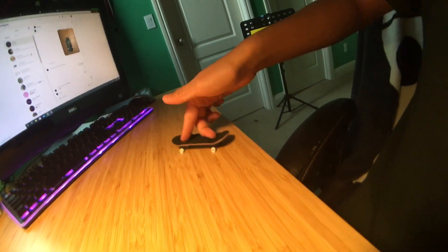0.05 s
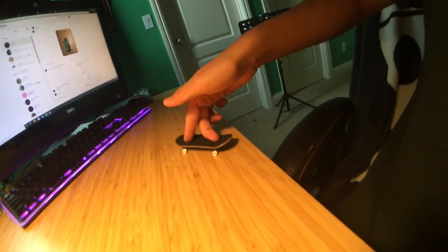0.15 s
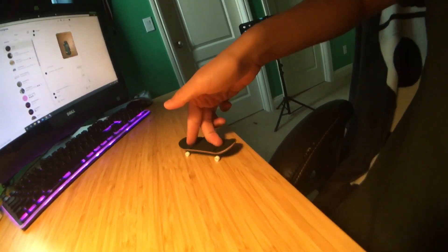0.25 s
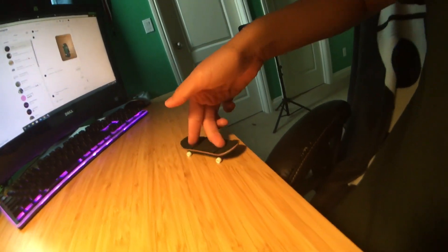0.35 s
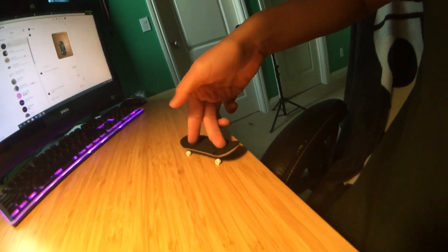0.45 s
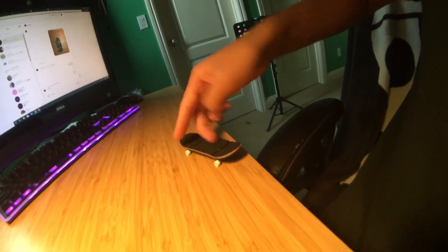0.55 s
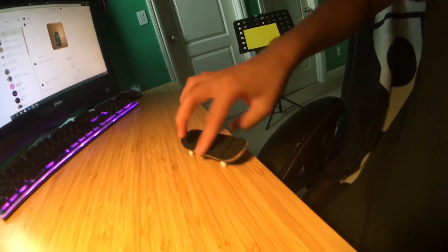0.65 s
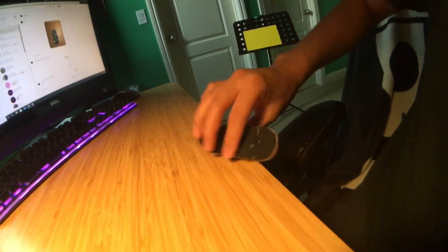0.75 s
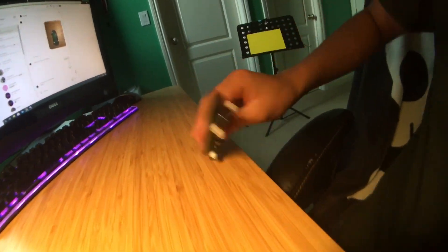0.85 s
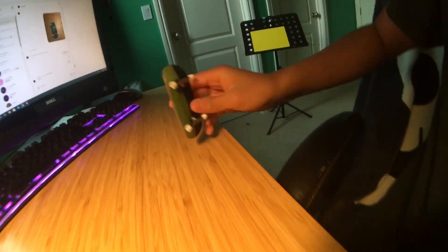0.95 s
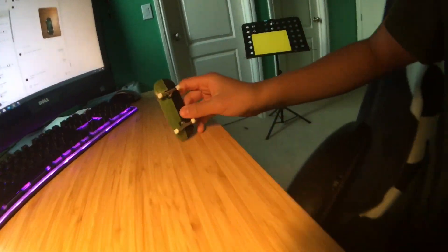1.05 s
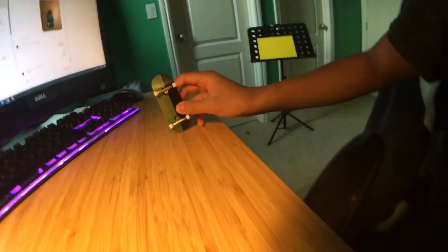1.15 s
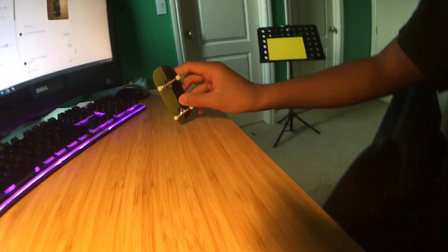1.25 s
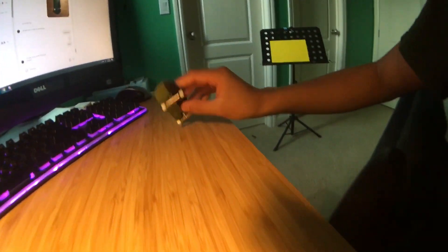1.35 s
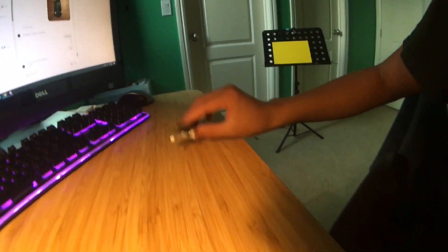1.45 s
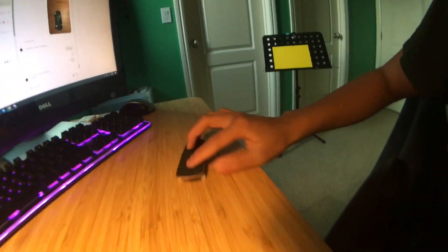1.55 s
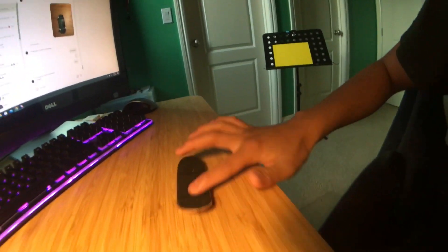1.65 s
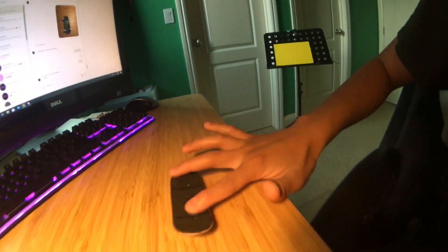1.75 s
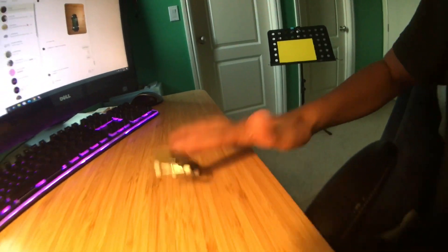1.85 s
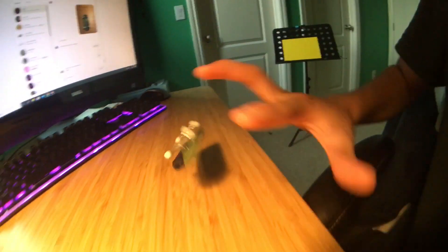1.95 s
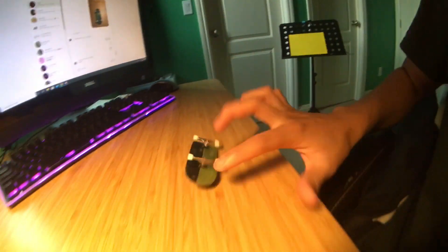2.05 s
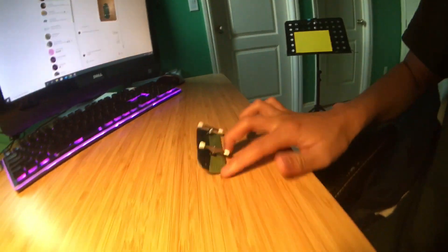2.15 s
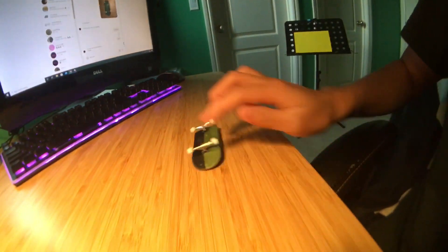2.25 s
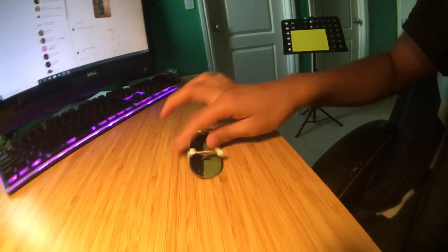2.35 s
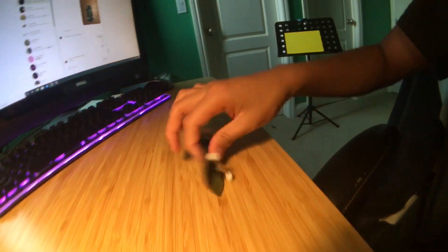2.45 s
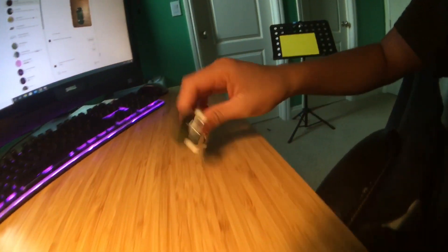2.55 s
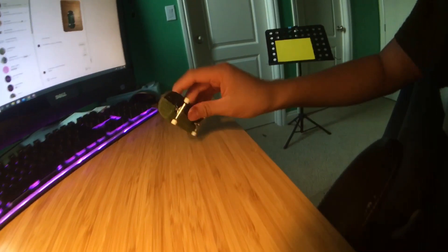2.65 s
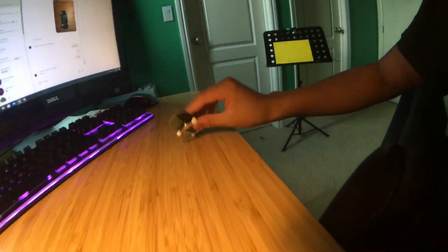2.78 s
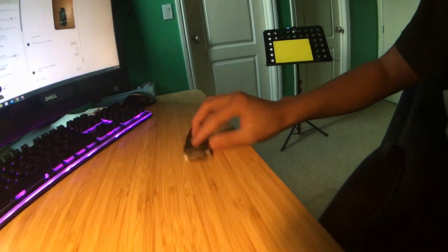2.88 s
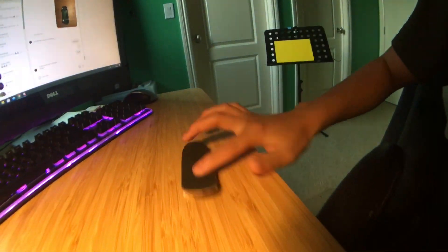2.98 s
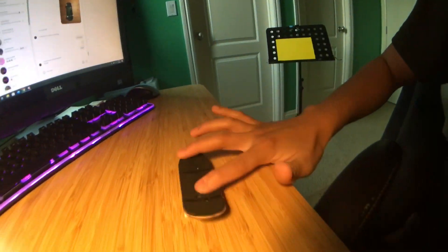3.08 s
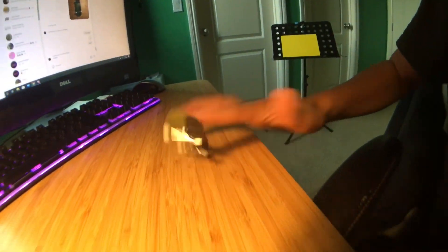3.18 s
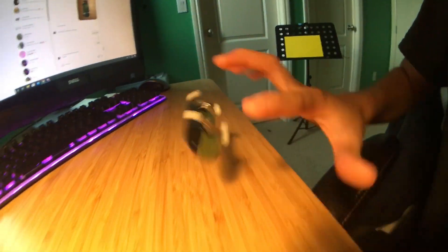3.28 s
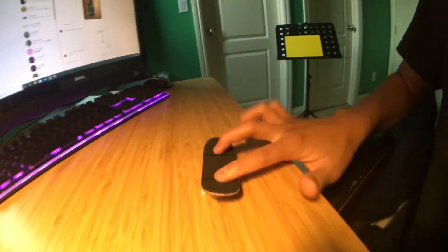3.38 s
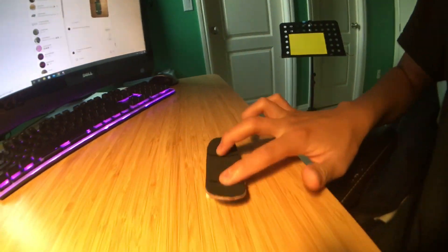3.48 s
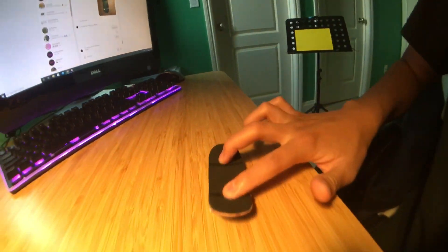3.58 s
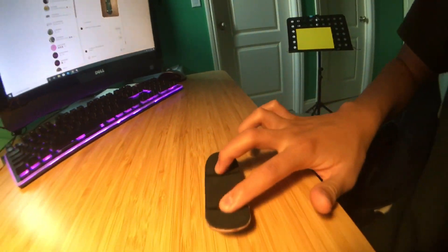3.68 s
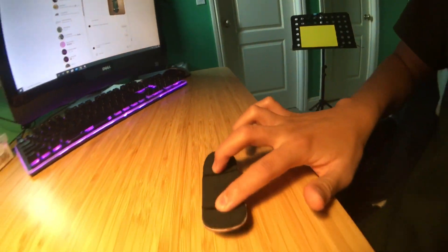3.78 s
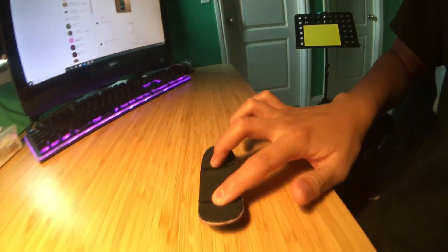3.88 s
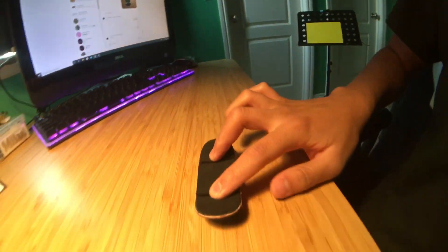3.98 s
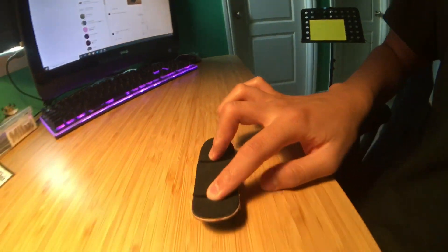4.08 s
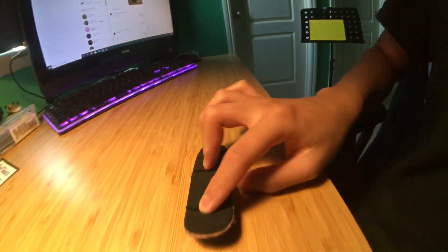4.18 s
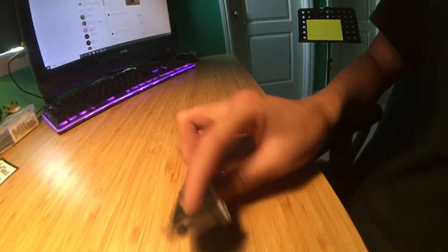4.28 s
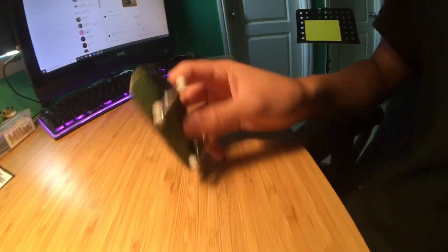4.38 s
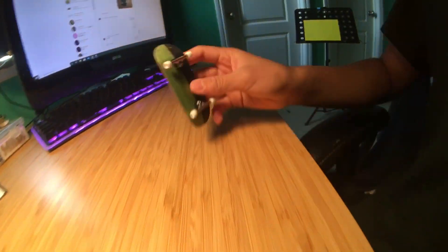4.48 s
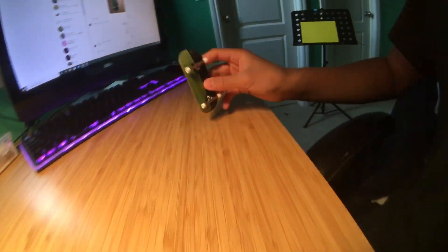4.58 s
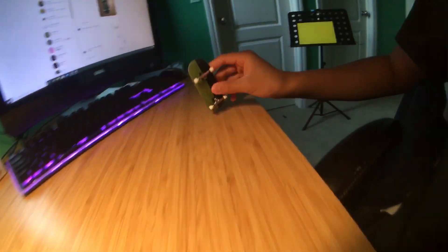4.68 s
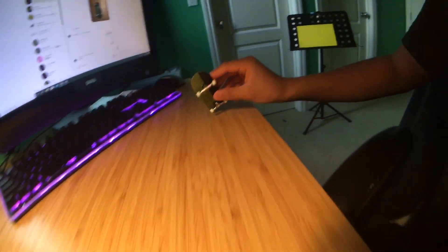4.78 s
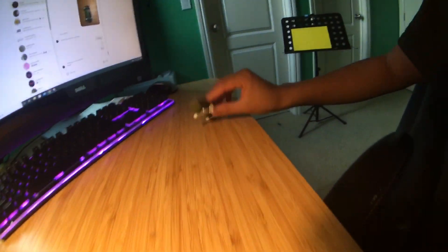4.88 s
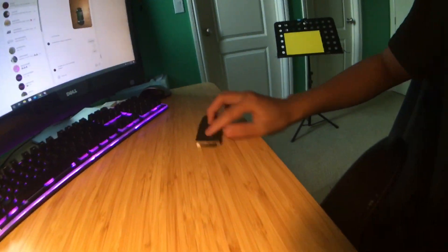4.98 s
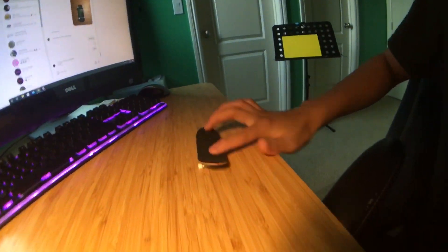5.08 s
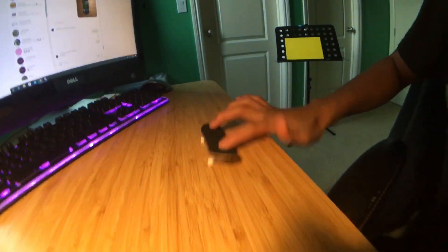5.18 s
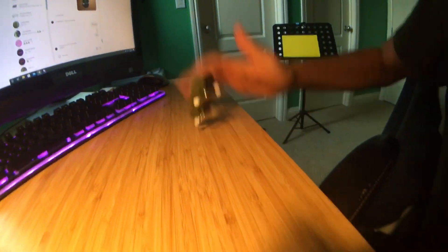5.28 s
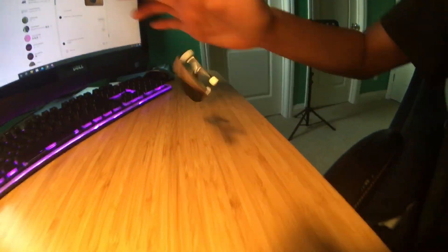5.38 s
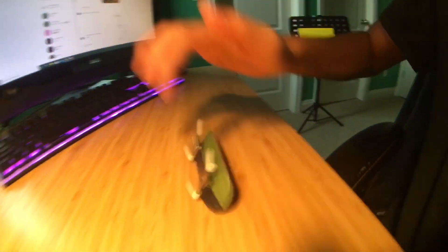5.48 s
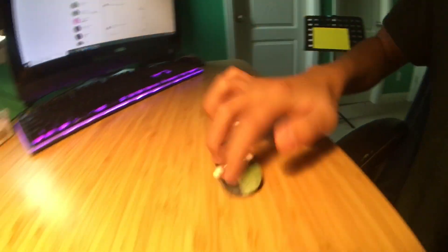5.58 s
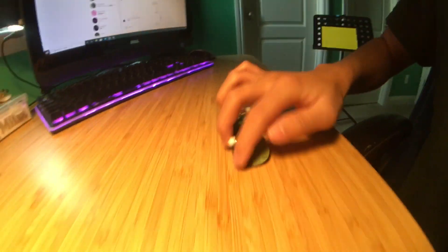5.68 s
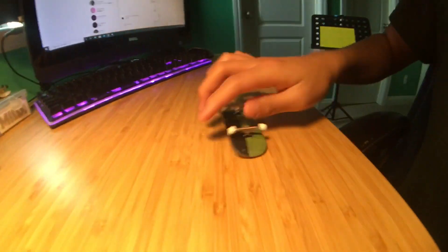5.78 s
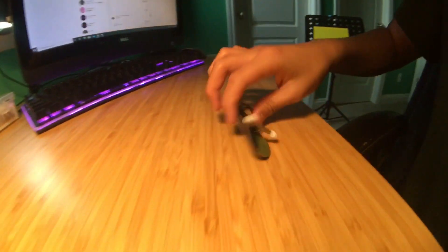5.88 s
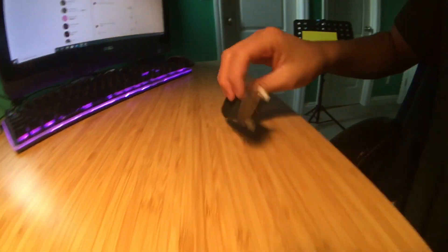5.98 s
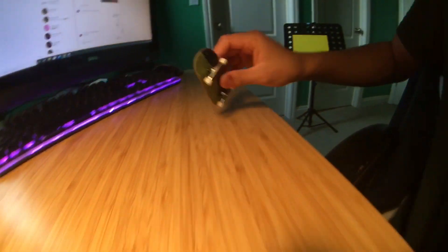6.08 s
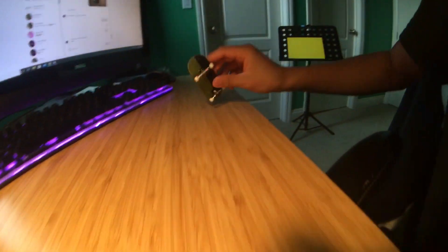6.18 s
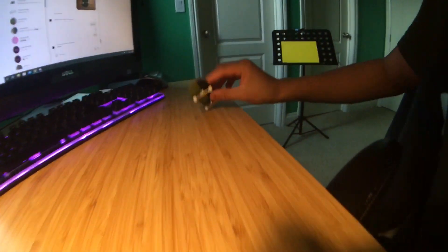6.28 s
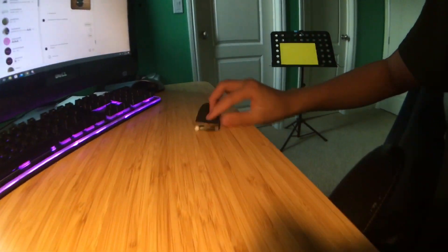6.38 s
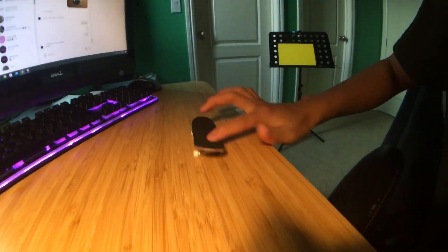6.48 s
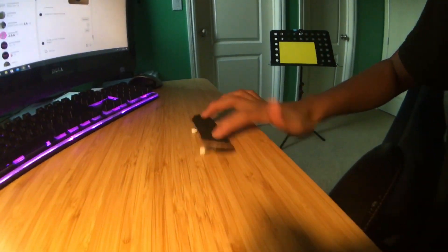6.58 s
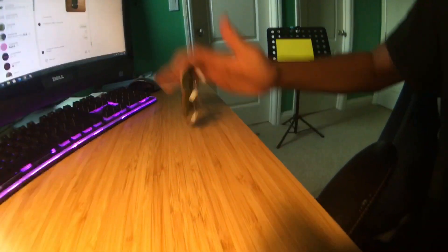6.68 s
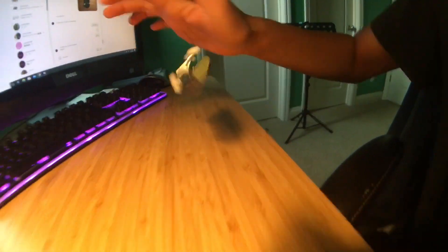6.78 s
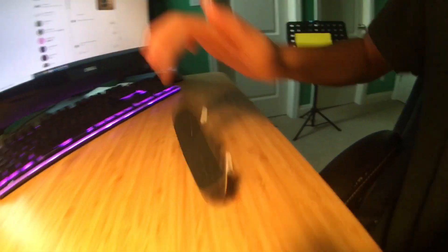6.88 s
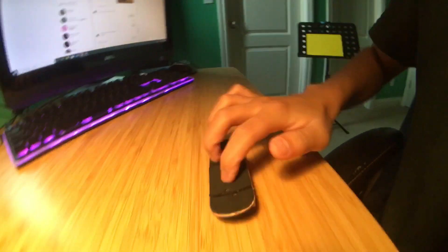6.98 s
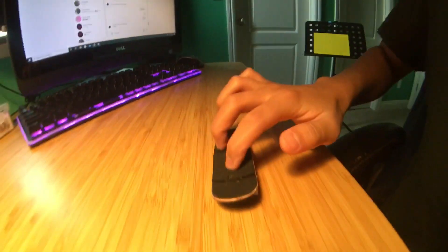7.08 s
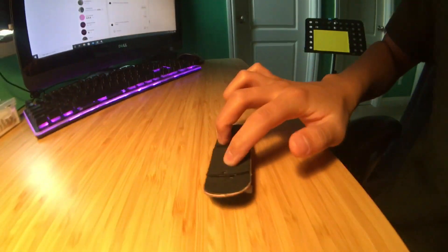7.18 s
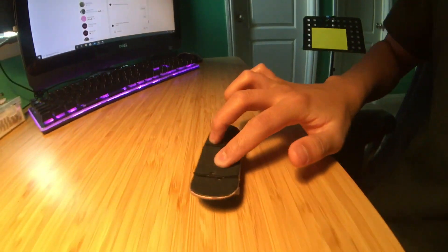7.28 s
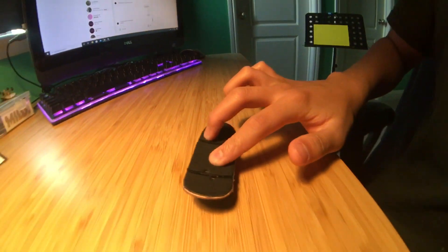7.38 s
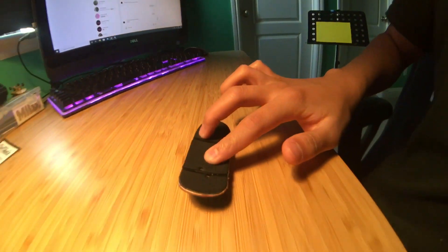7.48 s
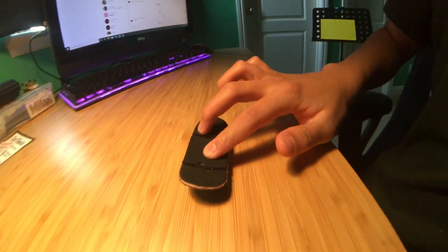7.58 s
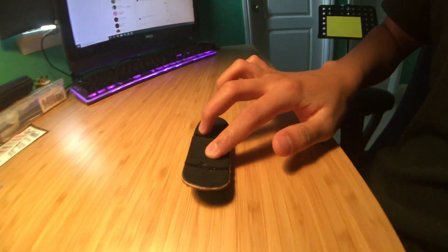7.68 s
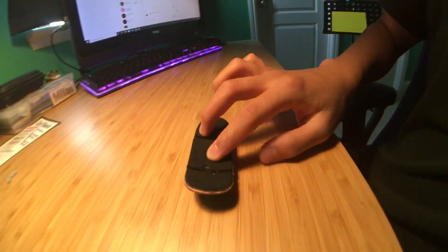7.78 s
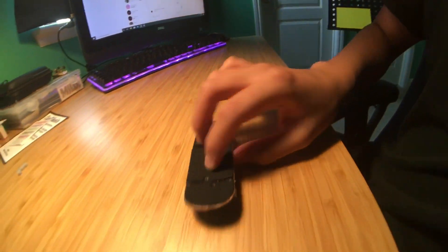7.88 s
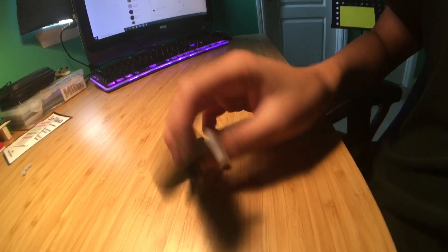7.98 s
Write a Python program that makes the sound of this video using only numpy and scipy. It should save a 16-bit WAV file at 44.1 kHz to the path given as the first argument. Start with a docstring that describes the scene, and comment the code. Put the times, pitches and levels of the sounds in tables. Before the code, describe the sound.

Small hard wheels patter low over wood grain, then hard clacks burst out as a miniature board lands on a desk. Four times come light set-down clicks, a brief rattling push, a loud tail pop and a landing or tumbling clatter with low desk thumps. Soft finger taps and slow rolls fill the gaps. The sound is close and slightly squashed at its peaks, with a short room tail and quiet hum.

```python
"""First comes the low patter of small wheels: a fingerboard rolls on a wooden desk, close to the microphone.
The place is a small room with still air and a computer hum, both made of shaped noise and steady tones.
Again and again the board is set down, rolls, pops its tail and lands or clatters over: bursts of noise and
dying modes, with desk, deck and room ringing on. Wheels are noise-driven resonances with rattle and grit.
The microphone has a notch in its treble and the loudest peaks are squashed."""
import sys
import numpy as np
from scipy import signal
from scipy.fft import rfft, irfft, next_fast_len
from scipy.io import wavfile

SR = 44100
rng = np.random.default_rng(int(sys.argv[2]) if len(sys.argv) > 2 else 0)


def dump(signal):
    """Clip the signal to [-1, 1] and save it as 16-bit WAV at the path in sys.argv[1]."""
    limited = np.clip(np.atleast_2d(signal).T, -1, 1)
    pcm = np.round(limited * 32767).astype(np.int16)
    wavfile.write(sys.argv[1], SR, pcm)


N = 354563
TIME = np.arange(N) / SR

# Levels are in dB; many of the functions below add trims of their own.

# still air of the room: pitch_hz, level_db [dB per Hz]
AIR = [(22, -31), (45, -4.5), (85, -5.5), (125, -3), (160, -4.5), (230, -12), (400, -14), (700, -20.5),
       (1150, -17.5), (2500, -30.5), (4500, -30), (8000, -36), (15000, -40.5)]
AIR_RMS_DB = -61.5
# steady computer hum and idle sway of the desk: pitch_hz, level_db [dB rms]
HUM = [(43.1, -70.5), (118.4, -66.5), (193.8, -67), (236.9, -69.5), (301.5, -83.5), (393, -76),
       (538.3, -80.5)]

# colour of the tail from desk and walls: pitch_hz, level_db
ROOM_COLOUR = [(60, -5.5), (200, 2.5), (500, -4), (1000, 3), (2500, -3.5), (5000, -6.5), (7500, -13),
               (12000, -11.5), (16000, -5.5)]
# decay of desk and room: pitch_hz, t60_s
ROOM_T60 = [(60, 0.63), (250, 0.38), (700, 0.53), (1800, 0.33), (4500, 0.54), (8000, 1), (14000, 0.39)]

# resonances of the desk top: pitch_hz, width_hz, level_db
DESK_RESONANCES = [(307, 11, 6.5), (355, 4.7, -8), (434.2, 8.9, 5.5), (539.4, 16, 0.5), (683, 11, 3),
                   (843, 16, -1.5), (954, 15, -5), (1067, 13, -9), (1167, 19, -7), (1320, 20, -8.5),
                   (1570, 33, -3.5), (1770, 15, -9), (1890, 37, -0.5), (2130, 24, -5), (2420, 35, -5.5),
                   (3170, 80, 1), (3490, 36, -1), (4050, 44, -4.5), (4700, 64, -8.5), (5340, 140, -4.5)]

# spectra of the rolling sounds: pitch_hz, level_db [dB per Hz]
RUMBLE_SPECTRUM = [(60, -41), (150, -30), (260, -26.5), (380, -16), (500, -6.5), (750, 4), (1150, 4.5),
                   (1650, 1.5), (1900, -3), (2300, -19), (3200, -45)]
DRONE_SPECTRUM = [(50, -14), (110, -11), (180, -4), (250, -15), (330, 1), (430, 0.5), (620, -2.5),
                  (1000, -38)]
RATTLE_SPECTRUM = [(1500, -4.5), (2300, 1.5), (3300, 1), (4600, 1.5), (5400, -3), (6200, -17.5),
                   (7500, -38), (9000, -46)]
FIZZ_SPECTRUM = [(5500, -21), (6800, -7), (7700, -22.5), (9200, -2.5), (10500, -9.5), (12000, 3),
                 (14000, -4), (15500, -6.5), (17000, -20)]

# spectra of the ringing desk top (low, wood) and deck: pitch_hz, level_db [dB per Hz]
LOW_RING_SPECTRUM = [(60, -4), (130, -7.5), (200, -4.5), (300, -7.5), (450, -4), (600, -12.5), (900, -42)]
WOOD_RING_SPECTRUM = [(300, -24), (550, 0), (800, -1), (1150, 2.5), (1500, -1.5), (2100, -0.5),
                      (2700, -12.5), (4000, -40.5)]
DECK_RING_SPECTRUM = [(1400, -23.5), (2400, -6.5), (3300, -1.5), (3900, -2), (4600, 1.5), (5400, -6.5),
                      (6200, -15.5), (7500, -28.5), (9000, -54.5)]

# fingers rub over the grip tape: centre_s, half_length_s [to 10 dB down], level_db
RUBS = [(0.95, 0.019, -56.5), (1.082, 0.051, -53), (1.69, 0.028, -36.5), (4.16, 0.08, -49),
        (5.035, 0.021, -30.5), (5.875, 0.0414, -50.5), (7.713, 0.034, -51)]
RUB_FIZZ_DB = -10  # against the rattle-coloured part

# wheels tick over the coarsest grit: start_s, level_db
COARSE_GRIT = [(0.153, -35), (0.4624, -34), (3.69, -31), (3.8611, -32), (4.0109, -24.5), (4.207, -22.5),
               (7.1386, -25.5), (7.222, -26), (7.3026, -29), (7.3422, -34), (7.707, -25), (7.7184, -28)]
FINE_GRIT_PER_S, FINE_GRIT_DB, FINE_GRIT_SPREAD_DB = 12, -5, 4  # level_db before trim, against the rumble

# the board coasts slowly, one list a ride:
# time_s, rumble_db, bite_db [rattle over rumble], wheel_resonance_hz
COASTS = [
    [(0.0, -40, -12, 870), (0.006, -38.5, -9, 898.5), (0.058, -34.5, -10.5, 985), (0.266, -46, -10.5, 826),
     (0.32, -41.5, -15, 677), (0.39, -45, -14.5, 838), (0.452, -39, -12.5, 725.4), (0.498, -53, -13, 644),
     (0.57, -60.5, -25, 600)],
    [(3.53, -56, -4.5, 1285), (3.576, -48, -3, 1134), (3.636, -43, -9.5, 1461), (3.71, -49.5, -7, 1383),
     (3.77, -48.5, -10, 982), (3.818, -44.5, -10, 1230), (4.062, -42, -9.5, 981), (4.112, -41, -14, 1080),
     (4.18, -38, -6, 1048)],
    [(7.05, -36, -13, 1067), (7.082, -42, -1.5, 1120), (7.13, -34.5, -11.5, 1140),
     (7.196, -42.5, -6.5, 1135), (7.324, -40.5, -11.5, 955), (7.374, -38.5, -10.5, 1166),
     (7.52, -44.5, -12, 1160), (7.552, -40, -10, 1200), (7.85, -39.5, -6.5, 964)],
]
COAST_DB, COAST_FADE_DB_PER_S = 4, 300

# the fingers push the board off: start_s, hardest_press_s, let_go_s, level_db,
# bite_db [at the hardest press], wheel_resonance_hz
PUSHES = [(1.44, 1.573, 1.724, -25.5, 2.5, 1119), (2.812, 2.944, 3.024, -25, 4, 978.6),
          (4.889, 5.016, 5.055, -29, 3.5, 1129), (6.319, 6.423, 6.5, -26.5, 5, 1097)]
PUSH_SOFT_START_DB, PUSH_ATTACK_S, PUSH_FALL_DB_PER_S = -12.5, 0.017, 180
PRESS_S, FREE_BITE_DB = 0.065, -13

# the wheels skid sideways: peak_s, level_db, bite_db, wheel_resonance_hz, rise_s [from 10 dB down]
SKIDS = [(1.691, -29, -2.5, 1057, .04), (3.01, -24, -17, 980.5, .025), (4.218, -27, -5.5, 754, 0.024),
         (4.287, -29, -10, 1307, 0.015), (5.175, -23, 1.5, 1392, 0.024), (5.924, -31, -19.5, 953.7, .035),
         (6.576, -19, -4.5, 1265, .028), (7.887, -21, -3, 1081, 0.023), (7.95, -30, -11, 1301, 0.018)]
SKID_FALL_S = 0.026  # to 10 dB down

# set down on one wheel, then an axle, then flat: wheel_s, axle_s, flat_s,
# next_wheel_lag_s, first_wheel_resonance_hz
SET_DOWNS = [(1.389, 1.435, 1.484, .0031, 1200), (2.7538, 2.8095, 2.867, .0052, 1150),
             (4.8472, 4.8793, 4.9354, .0026, 1400), (6.2721, 6.3076, 6.3502, .0078, 1220)]
LAST_WHEEL_LAGS = 1.48  # in lags of the next wheel, after the flat contact
SPIN_UP_S, SPIN_UP_DB, SPIN_UP_BITE_DB, SPIN_DOWN_DB_PER_S = .013, -22.5, -8.5, 600

# heavy, soft blows of the hand on the desk: start_s, level_db, pitch_hz
THUMPS = [(0.648, -25, 114), (2.098, -24.5, 97.5), (2.215, -35.5, 97), (2.322, -33.5, 130),
          (2.347, -23, 102), (3.3575, -1.5, 60.9), (5.549, -16.5, 96), (5.571, -16.5, 118),
          (5.801, -22, 79.6), (5.809, -20, 122)]
CRASH_THUMP_HZ, THUMP_T60_S = 102, 0.072

# the tail is popped against the desk: start_s, level_db, ring_on_db
POPS = [(1.8229, -0.5, 1.5), (3.1384, 1.5, 0), (5.23, 1, -2), (6.6159, .5, 0)]
# the board crashes on one edge, then the other, and rebounds: start_s, level_db,
# wood_over_deck_db, ring_on_db, desk_thump_db, second_edge_lag_s
CRASHES = [(0.6685, -3.5, 1, 2, -46.5, .0036), (1.9935, 3, -1, -2.5, -35.5, 0.0032),
           (3.3398, 1.5, -2.5, 0.5, -40, .0024), (3.3519, -3.5, -8.5, -0.5, -12.5, 0.0052),
           (5.468, 2.5, 4.5, -1, -16.5, .0032), (6.8754, 1, 1, 1.5, -21.5, .003),
           (6.9012, 1, 6, -22, -21, 0.00206), (6.9252, 4, 4.5, -5, -17, 0.0077),
           (6.945, 1, 0, 5, -12, 0.0053), (6.969, -10, -7, 1.5, -40, 0.0033)]
REBOUND_S = 0.015  # after the first edge
# light touches and firmer taps of the fingers on board and desk:
# start_s, level_db, wood_over_deck_db, extra_thud_db
TAPS = [(0.5905, -24.5, 4.5, -11), (0.645, -17.5, 6, 12.5), (0.7427, -5, 4, 2.5), (1.0604, -17.5, 4.5, 5.5),
        (1.791, -28, -5, -15.5), (2.07, 1, -2.5, 0), (2.099, -15.5, -1, -9.5), (2.315, -29, -3, 3),
        (2.352, -26, -3, -3.5), (2.482, -29.5, -0.5, -9.5), (3.1115, -20, -3.5, -14),
        (3.3164, -25.5, -4, -9), (3.329, -23.5, -6, -1), (4.2958, -8.5, 5, 3), (5.221, -9, 1.5, -17),
        (5.445, -28, 3.5, -3.5), (5.545, -8.5, -7.5, 8.5), (5.789, -26, 0.5, -4.5), (5.812, -15.5, -4.5, 7),
        (5.9018, 1.5, 4, 1.5)]
# what each kind of blow excites: low_thud_db, wood_knock_db, deck_crack_db, metal_tick_db, ring_on_db
BLOW_KINDS = {"wheel": (-43.5, -22, -20, -30.5, -9), "axle": (-27, -17, -14, -38.5, -2),
              "flat": (-36, -21, -16, -28.5, 1), "next wheel": (-25, -16, -14, -32.5, -1.5),
              "last wheel": (-22.5, -20.5, -19.5, -40, -7), "pop": (-22, -20.5, -13.5, -28.5, -7),
              "tap": (-26, -21.5, -21.5, -29.5, -2.5), "first edge": (-32.5, -20, -16.5, -28, 4.5),
              "second edge": (-23.5, -13.5, -18.5, -34.5, 0), "rebound": (-38, -37, -27.5, -49.5, 14.5)}

# modes of a blow, from desk up to deck: pitch_hz, level_db, t60_s
THUD_MODES = [(156, -7.5, 0.041), (227, -3, 0.11), (294.6, 5.5, 0.096), (413, 2, 0.039), (449, -2.5, 0.045)]
KNOCK_MODES = [(514, -14.5, 0.09), (630, -18, 0.012), (820, 2.5, 0.042), (1062, 1, 0.034), (1107, 0, 0.08),
               (1381, 1, 0.0078), (1594, 5, 0.034), (1794, -3.5, 0.042), (2062, -3, 0.037)]
CRACK_MODES = [(2550, -9.5, 0.0047), (3312, -6, 0.039), (3640, 1.5, 0.016), (3900, -2, 0.022),
               (4530, 1, 0.0082), (5070, 4, 0.024), (5860, -11.5, 0.0073)]

CUTOFF_HZ = 16100  # upper edge of the sound; nothing is heard above it


def from_db(db):
    """Turns decibels into an amplitude factor."""
    return 10 ** (np.asarray(db) / 20)


def rms_one(x):
    """Scales a sound to rms 1."""
    return x / np.sqrt(np.mean(x ** 2) + 1e-20)


def at_hz(points, hz):
    """Reads a table on a log-frequency axis."""
    known_hz, values = np.transpose(points)
    return np.interp(np.log(np.maximum(hz, 1)), np.log(known_hz), values)


def dying(t, t60):
    """Exponential decay, 60 dB down after t60 seconds."""
    return np.exp(-np.log(1000) * t / t60)


def band(x, low_hz, high_hz, order=2):
    """Keeps what lies between two frequencies."""
    edges_hz = [low_hz, min(high_hz, .45 * SR)]
    return signal.sosfilt(signal.butter(order, edges_hz, "band", fs=SR, output="sos"), x)


def coloured(x, spectrum):
    """Gives a steady sound a spectrum; rms 1."""
    size = next_fast_len(len(x))
    hz = np.arange(size // 2 + 1) * SR / size
    shaped = rfft(x, size) * from_db(at_hz(spectrum, hz))
    return rms_one(irfft(shaped, size)[:len(x)])


def add(out, s, sound):
    """Mixes a sound in at a time."""
    start = max(round(s * SR), 0)
    out[start:start + len(sound)] += sound[:N - start]


def drift(rate):
    """Slow chance: normal random knots, rate per second, joined by straight lines."""
    knots = rng.standard_normal(4096)
    return np.interp(TIME * rate, np.arange(len(knots)), knots)


def resonance(x, hz, width_hz):
    """Two-pole resonance with gain 1 on top."""
    r = np.exp(-np.pi * width_hz / SR)
    zeros = np.array([1, 0, -1]) * (1 - r * r) / 2
    poles = [1, -2 * r * np.cos(2 * np.pi * hz / SR), r * r]
    return signal.lfilter(zeros, poles, x + 1e-18)


def unit_blow(x):
    """Scales a blow to rms 1 over its first five milliseconds."""
    return x / np.sqrt(np.mean(x[:SR // 200] ** 2) + 1e-20)


def held(start_s, end_s, rise_db_per_s, fall_db_per_s):
    """Rise, hold and fall, in dB."""
    return -rise_db_per_s * np.maximum(start_s - TIME, 0) - fall_db_per_s * np.maximum(TIME - end_s, 0)


def swell(s, rise_s, fall_s):
    """A rounded swell in dB, 10 dB down at its rise and fall times."""
    return -10 * ((TIME - s) / np.where(TIME < s, rise_s, fall_s)) ** 2


def background():
    """Still room air as coloured noise, and the computer hum as steady tones."""
    hum = 0
    for hz, rms_db in HUM:
        hum = hum + from_db(rms_db) * np.sqrt(2) * np.sin(2 * np.pi * (hz * TIME + rng.random()))
    return hum + from_db(AIR_RMS_DB) * coloured(rng.standard_normal(N), AIR)


def room(x, build_up_s):
    """A dense tail from desk and walls: noise in bands, each with its own decay and level."""
    t, tail = np.arange(SR * 3 // 5) / SR, 0
    edges = np.geomspace(45, 18000, 18)
    white = rng.standard_normal((2, len(t)))
    for k, (low, high) in enumerate(zip(edges, edges[1:])):
        hz = np.sqrt(low * high)
        part = band(white[k % 2], low, high) * dying(t, at_hz(ROOM_T60, hz)) * (1 - np.exp(-t / build_up_s))
        even_energy = np.sqrt(2 * (high - low) / SR / np.sum(part ** 2))
        tail = tail + from_db(at_hz(ROOM_COLOUR, hz)) * part * even_energy
    return signal.fftconvolve(x, tail)[:N]


def desk_top(x):
    """Resonances of the wooden top stand out of its dense response."""
    return x + sum(from_db(db) * resonance(x, hz, width_hz) for hz, width_hz, db in DESK_RESONANCES)


def sway():
    """Every blow sets the desk swaying on its legs, a narrow low resonance."""
    jolts = np.zeros(N)
    for s, thud_db, *rest in contacts():
        add(jolts, s, from_db([thud_db / 2]))
    return from_db(37.0) * band(resonance(jolts, hz=44.4, width_hz=1.6), low_hz=34.2, high_hz=60, order=3)


def grains(per_s, spread_db):
    """Random micro-impacts of uneven size."""
    sizes = from_db(spread_db * np.minimum(rng.exponential(1, N), 4)) * rng.choice([-1, 1], N)
    return sizes * (rng.random(N) < per_s / SR)


def rubs():
    """Skin drags over the grip tape with a faint, grainy hiss."""
    level = sum(from_db(db + np.maximum(swell(s, half_s, half_s), -80)) for s, half_s, db in RUBS)
    grain = grains(per_s=1300, spread_db=2.0)
    return level * (coloured(grain, RATTLE_SPECTRUM) + from_db(RUB_FIZZ_DB) * coloured(grain, FIZZ_SPECTRUM))


def chatter(t, low_hz, high_hz, t60):
    """A burst of micro-contacts on the wood: dying noise in a band."""
    return unit_blow(band(rng.standard_normal(len(t)) * dying(t, t60), low_hz, high_hz, order=3))


def grit(rumble_db):
    """Tiny bright ticks under the wheels, answered by the deck; fine ones fall at random and follow the rumble."""
    t, out = np.arange(SR // 100) / SR, np.zeros(N)
    met = np.flatnonzero(rng.random(N) < FINE_GRIT_PER_S / SR)
    fine = [(i / SR, rumble_db[i] + FINE_GRIT_DB + FINE_GRIT_SPREAD_DB * rng.standard_normal()) for i in met]
    for s, db in COARSE_GRIT + fine:
        tick = chatter(t, low_hz=9600, high_hz=16100, t60=0.0049)
        answer = 0.54 * chatter(t, low_hz=2500, high_hz=6800, t60=.004)
        add(out, s, from_db(db - 21.5) * (tick + answer))
    return out


def wheel_note(pitch_hz, width_hz):
    """The wheels bounce on their contact with the wood: narrow noise moved up to the resonance pitch."""
    shaking = rng.standard_normal(N) + 1j * rng.standard_normal(N)
    swing = signal.sosfilt(signal.butter(2, width_hz / 2, fs=SR, output="sos"), shaking)
    return rms_one(np.real(swing * np.exp(2j * np.pi * np.cumsum(pitch_hz) / SR)))


def rolling(rumble_db, rattle_db, pitch_hz, width_hz, side_notes, drone_db, fizz_db):
    """Wheels patter over the wood grain and make the desk drone, while bearings and trucks rattle and fizz."""
    bumps = drift(110)   # slightly uneven wheels press and lift
    # the more and the less loaded wheels resonate above and below the main note
    others = 0.37 * wheel_note(1.42 * pitch_hz, width_hz=300) + 0.28 * wheel_note(.66 * pitch_hz, width_hz=160)
    grain = .5 * coloured(grains(per_s=1000, spread_db=1.5), RUMBLE_SPECTRUM)
    patter = 0.72 * wheel_note(pitch_hz, width_hz) + side_notes * others + grain
    rumble = from_db(rumble_db - 4.5 + 2 * bumps) * rms_one(desk_top(patter))
    # the drone follows about half the rumble's dB and loses 6 dB per octave of wheel pitch
    low_db = drone_db + 0.54 * rumble_db - 6 * np.log2(pitch_hz / 1000)
    drone_grain = coloured(grains(per_s=1900, spread_db=4), DRONE_SPECTRUM)
    drone = from_db(low_db) * rms_one(desk_top(drone_grain))
    rattle_grain = coloured(grains(per_s=2600, spread_db=0.5), RATTLE_SPECTRUM)
    rattle = from_db(rattle_db - 2.5 + 1.8 * bumps) * rattle_grain
    # when rumble and rattle rise together, the fizz rises faster than either
    high_db = fizz_db + 0.77 * rattle_db + 0.82 * rumble_db + 9.2 * bumps
    fizz = from_db(high_db) * coloured(grains(per_s=1000, spread_db=0.5), FIZZ_SPECTRUM)
    return rumble + drone + rattle + fizz


def together(strokes):
    """Joins strokes of (level dB, bite dB, pitch Hz) into rumble dB, rattle dB and a power-weighted pitch."""
    rumble = rattle = pitch = 0
    for db, bite_db, hz in strokes:
        power = from_db(np.maximum(db, -130)) ** 2
        rumble = rumble + power
        rattle = rattle + power * from_db(bite_db) ** 2
        pitch = pitch + power * hz
    return 10 * np.log10(rumble), 10 * np.log10(rattle), pitch / rumble


def coasts():
    """Slow, quiet rolling under a light hand; level, bite and pitch glide between the table's points."""
    strokes = []
    for coast in COASTS:
        s, *columns = np.transpose(coast)
        db, bite_db, hz = [np.interp(TIME, s, c) for c in columns]
        shape_db = held(s[0], s[-1], COAST_FADE_DB_PER_S, COAST_FADE_DB_PER_S)
        strokes.append((db + COAST_DB + shape_db, bite_db, hz))
    return together(strokes)


def pushes():
    """A push gathers level once an axle is down and bites hardest as the fingers press."""
    strokes = []
    for start_s, press_s, end_s, db, bite_db, hz in PUSHES:
        press = np.exp(-np.minimum(((TIME - press_s) / PRESS_S) ** 2, 20))
        gather_db = PUSH_SOFT_START_DB * np.exp(-np.maximum(TIME - start_s, 0) / PUSH_ATTACK_S)
        shape_db = gather_db + held(start_s, end_s, rise_db_per_s=2994, fall_db_per_s=PUSH_FALL_DB_PER_S)
        strokes.append((db + shape_db, FREE_BITE_DB + (bite_db - FREE_BITE_DB) * press, hz))
    return together(strokes)


def slips():
    """Slipping wheels: sideways skids swell and fade; the first wheel spins up in a short burst at a set-down."""
    strokes = [(db + swell(s, rise_s, SKID_FALL_S), bite_db, hz) for s, db, bite_db, hz, rise_s in SKIDS]
    for s, *_, hz in SET_DOWNS:
        shape_db = held(s + 0.0037, s + SPIN_UP_S, rise_db_per_s=6002.5, fall_db_per_s=SPIN_DOWN_DB_PER_S)
        strokes.append((SPIN_UP_DB + shape_db, SPIN_UP_BITE_DB, hz))
    return together(strokes)


def thumps():
    """The desk swings for a few cycles after a heavy blow or crash, with a dull puff of low noise."""
    t, out = np.arange(SR // 3) / SR, np.zeros(N)
    crashes = [(s + lag_s, thump_db, CRASH_THUMP_HZ) for s, *_, thump_db, lag_s in CRASHES]
    for s, db, hz in THUMPS + crashes:
        puff = 0.44 * rms_one(band(rng.standard_normal(len(t)), low_hz=55, high_hz=150, order=3))
        swing = np.sin(2 * np.pi * hz * t) + puff
        add(out, s, from_db(db) * swing * dying(t, THUMP_T60_S) * (1 - np.exp(-t / 0.0018)))
    return out


def blow(kind, s, db=0, wood_db=0, ring_db=0, thud_db=0):
    """One contact as (s, thud, knock, crack, tick, ring dB); a flatter hit sounds more desk and less deck."""
    thud, knock, crack, tick, ring = BLOW_KINDS[kind]
    return (s, thud + db + thud_db, knock + db + wood_db, crack + db - wood_db,
            tick + db - 0.57 * wood_db, ring + ring_db)


def contacts():
    """All blows of the ride: set-downs, pops, crashes and taps."""
    rows = [blow("pop", s, db, ring_db=ring_db) for s, db, ring_db in POPS]
    for wheel_s, axle_s, flat_s, lag_s, _ in SET_DOWNS:
        rows += [blow("wheel", wheel_s), blow("axle", axle_s), blow("flat", flat_s),
                 blow("next wheel", flat_s + lag_s), blow("last wheel", flat_s + LAST_WHEEL_LAGS * lag_s)]
    for s, db, wood_db, ring_db, _, lag_s in CRASHES:
        rows += [blow("first edge", s, db, wood_db, ring_db),
                 blow("second edge", s + lag_s, db, wood_db, ring_db),
                 blow("rebound", s + REBOUND_S, db + ring_db, wood_db)]   # a loose, ringing board rebounds more
    return rows + [blow("tap", s, db, wood_db, thud_db=thud_db) for s, db, wood_db, thud_db in TAPS]


def ring_on(level_db, spectrum, t60):
    """Each blow feeds energy into a crowd of close modes, from which it leaks away."""
    energy = np.zeros(N)
    for (s, *levels, ring_db), db in zip(contacts(), level_db):
        # fingers on the deck damp it; a loose board rings on
        add(energy, s + 0.0012, from_db([db + ring_db]) ** 2)
    energy = signal.lfilter([1], [1, -dying(1 / SR, t60) ** 2], energy + 1e-18)
    return np.sqrt(energy) * coloured(rng.standard_normal(N), spectrum)


def ringing():
    """Desk top, deck and trucks ring on after the blows."""
    s, thud_db, knock_db, crack_db, tick_db, ring_db = np.transpose(contacts())
    desk = ring_on(thud_db - 7.5, LOW_RING_SPECTRUM, t60=0.2)
    desk = desk + ring_on(knock_db - 10, WOOD_RING_SPECTRUM, t60=0.21)
    deck = ring_on(crack_db - 11.0, DECK_RING_SPECTRUM, t60=0.22)
    trucks = ring_on(tick_db - 11.5, FIZZ_SPECTRUM, t60=0.18)
    return desk_top(desk + deck + trucks)


def afterring(blows, width_hz):
    """The lower resonances of the desk, struck by the blows, sing on faintly."""
    return sum(from_db(db / 2) * resonance(blows, hz, width_hz) for hz, _, db in DESK_RESONANCES if hz < 2000)


def struck(modes, t, spread_db, detune):
    """The place of the blow sets each mode's strength and sign; the grip shifts its pitch."""
    hz, db, t60 = np.transpose(modes)[:, :, None]
    strength = from_db(db + spread_db * rng.standard_normal(hz.shape)) * rng.choice([-1, 1], hz.shape)
    pitch = hz * (1 + detune * rng.standard_normal(hz.shape))
    return unit_blow(np.sum(strength * np.sin(2 * np.pi * pitch * t) * dying(t, t60), axis=0))


def snap(t, hz, t60):
    """The first hard contact flexes the deck for a few fast cycles."""
    pitch = hz * (1 + 0.081 * rng.standard_normal())
    return unit_blow(np.sin(2 * np.pi * pitch * t) * dying(t, t60) * (1 - np.exp(-t / 0.00051)))


def clacks():
    """Every blow sounds desk, deck and metal trucks: struck modes plus bursts of contact noise."""
    t, out = np.arange(SR // 10) / SR, np.zeros(N)
    for s, thud_db, knock_db, crack_db, tick_db, ring_db in contacts():
        thud = 0.48 * struck(THUD_MODES, t, spread_db=2.0, detune=0.011)
        thud = thud + .5 * chatter(t, low_hz=100, high_hz=512.6, t60=0.0083)
        knock = 0.5 * struck(KNOCK_MODES, t, spread_db=9.5, detune=0.015)
        knock = knock + 0.56 * chatter(t, low_hz=540, high_hz=2300, t60=0.023)
        crack = .5 * snap(t, hz=4744, t60=0.003) + 0.41 * struck(CRACK_MODES, t, spread_db=8.5, detune=0.018)
        crack = crack + 0.61 * chatter(t, low_hz=2590, high_hz=5200, t60=0.011)
        tick = chatter(t, low_hz=10560, high_hz=16400, t60=0.0091)
        desk = from_db(thud_db - 0.5) * thud + from_db(knock_db) * knock
        board = from_db(crack_db + 0.5) * crack + from_db(tick_db) * tick
        add(out, s, desk + board)
    return out


def scene():
    """Blows, wheels and fingers on the desk, heard close up in a small room."""
    blows, rings, thuds, coasting = clacks(), ringing(), thumps(), coasts()
    wheels = (rolling(*coasting, width_hz=350, side_notes=0.96, drone_db=-28.5, fizz_db=-13)
              + rolling(*pushes(), width_hz=310, side_notes=1.5, drone_db=-33, fizz_db=-9.5)
              + rolling(*slips(), width_hz=150, side_notes=0.62, drone_db=-38.5, fizz_db=-12)
              + grit(coasting[0]) + rubs())
    singing = from_db(-5.5) * afterring(blows, width_hz=3.3)
    to_room = from_db(-19.0) * blows + from_db(-13.0) * rings + from_db(-14.5) * wheels + from_db(-17.0) * thuds
    walls = room(to_room, build_up_s=0.00076)
    return (blows + rings + singing + wheels + thuds + walls + sway() + background())[None]


def record(dry):
    """The microphone port cuts a notch in the treble; the loudest peaks are squashed and the top is cut."""
    ported = dry - .6 * resonance(dry, hz=7650, width_hz=800)
    squashed = ported / (1 + (ported / .86) ** 6) ** (1 / 6)
    return signal.sosfilt(signal.ellip(10, .1, 80, CUTOFF_HZ, fs=SR, output="sos"), squashed)


dry = scene()
out = record(dry)
dump(out)
```